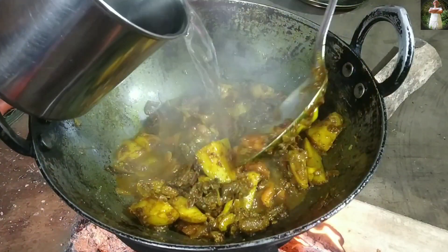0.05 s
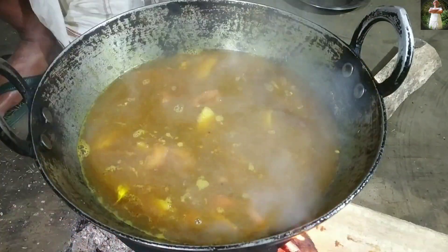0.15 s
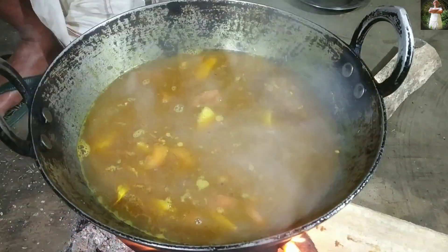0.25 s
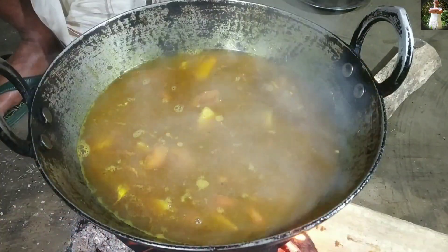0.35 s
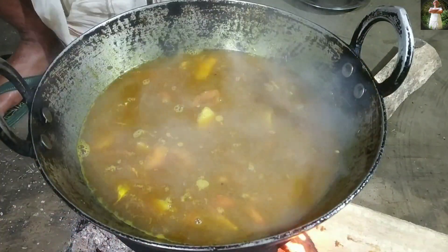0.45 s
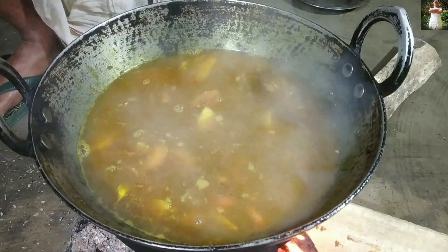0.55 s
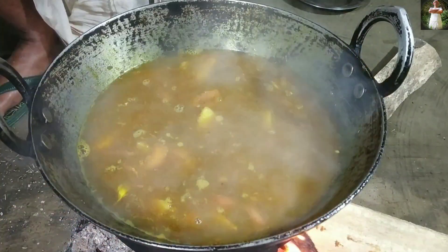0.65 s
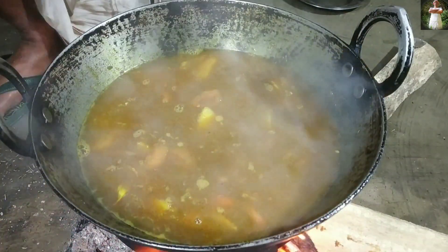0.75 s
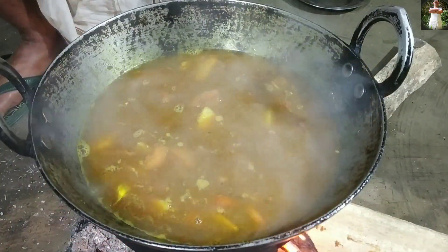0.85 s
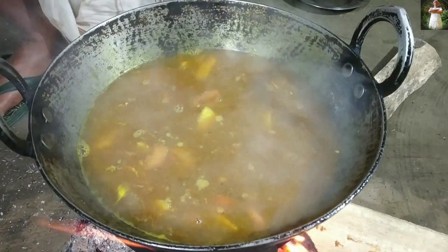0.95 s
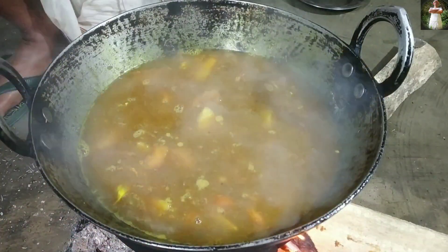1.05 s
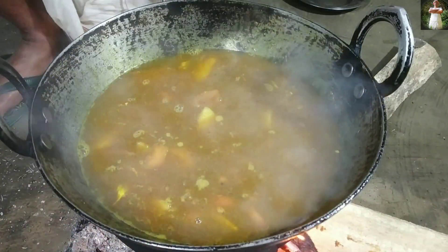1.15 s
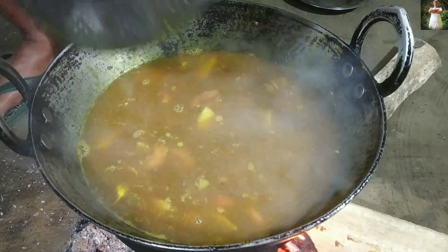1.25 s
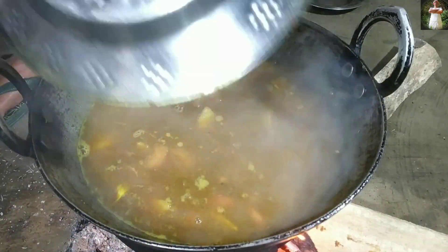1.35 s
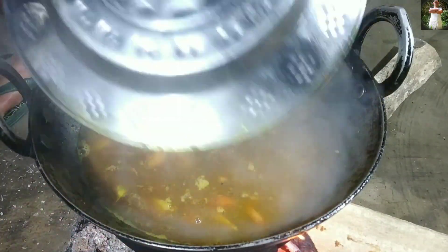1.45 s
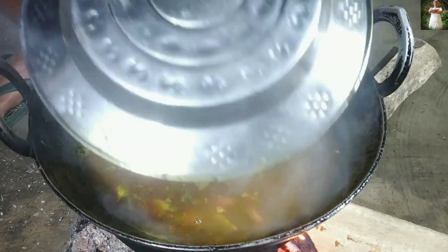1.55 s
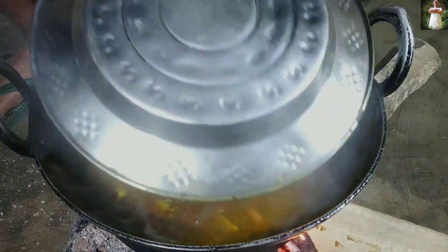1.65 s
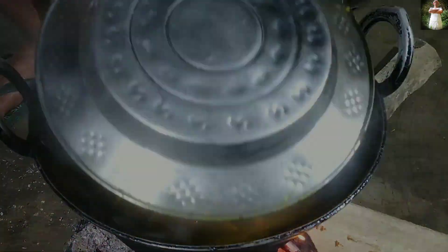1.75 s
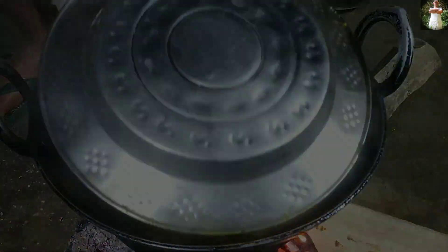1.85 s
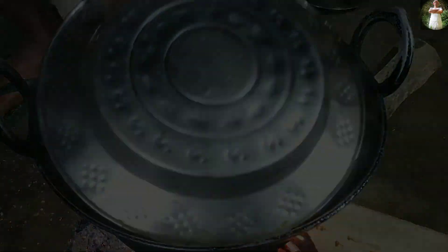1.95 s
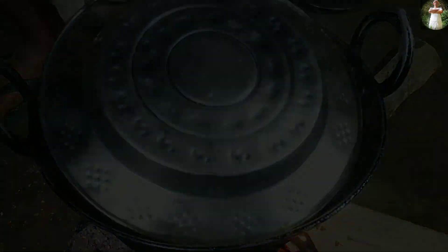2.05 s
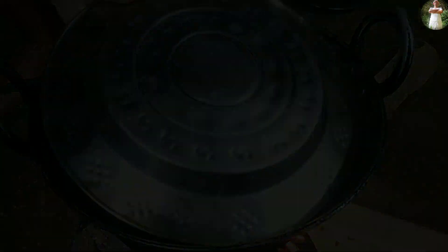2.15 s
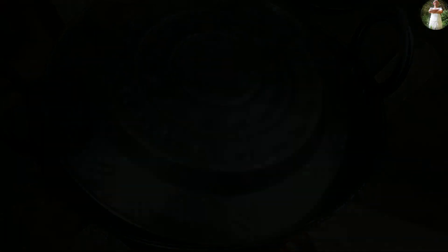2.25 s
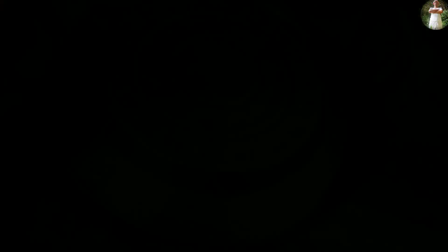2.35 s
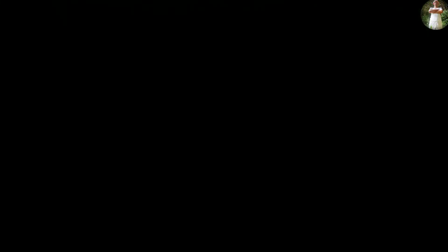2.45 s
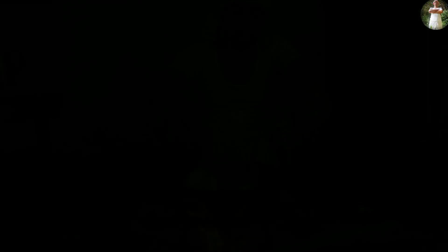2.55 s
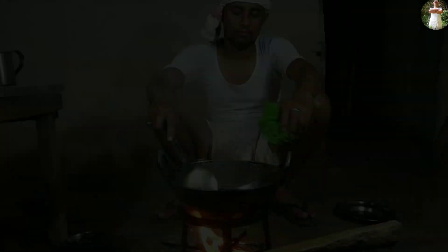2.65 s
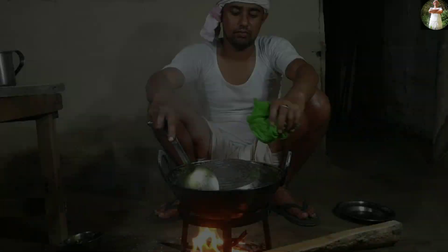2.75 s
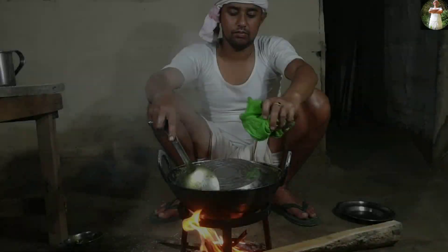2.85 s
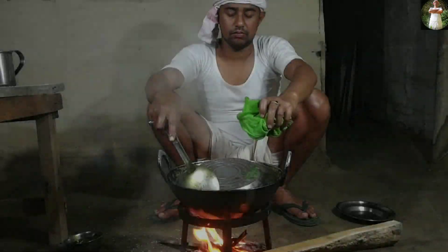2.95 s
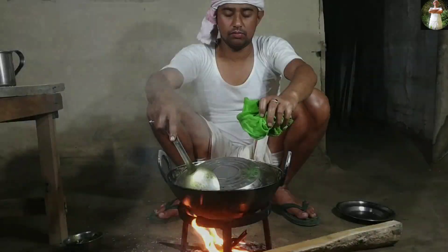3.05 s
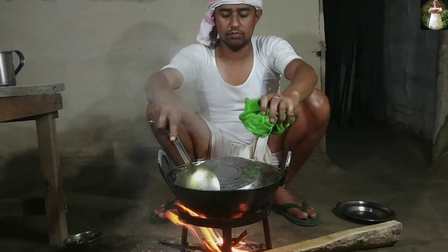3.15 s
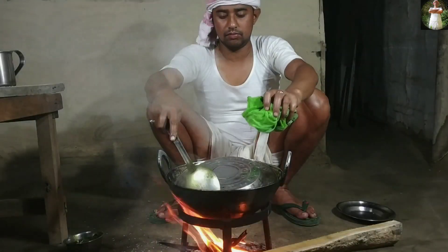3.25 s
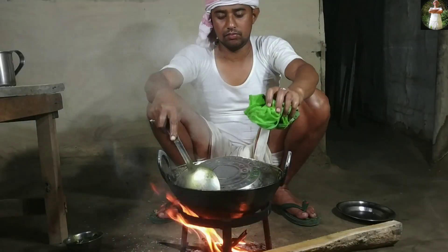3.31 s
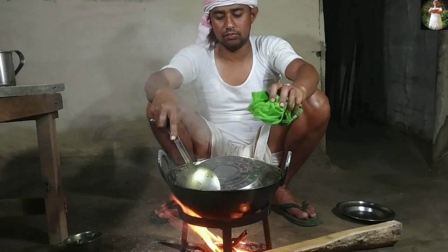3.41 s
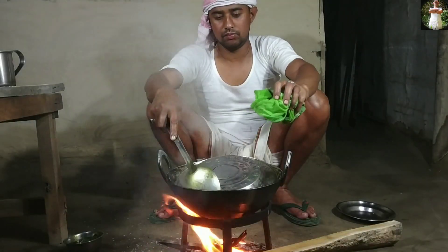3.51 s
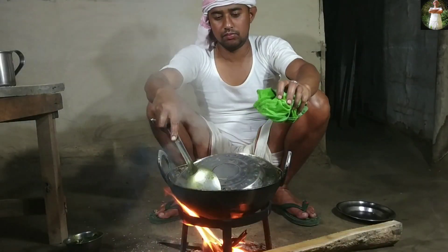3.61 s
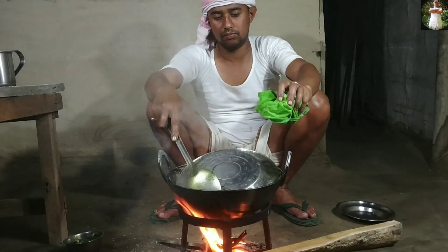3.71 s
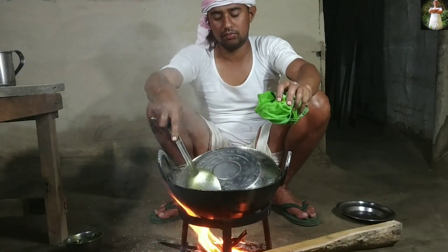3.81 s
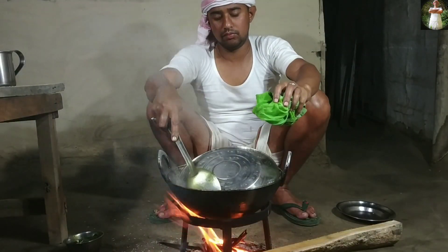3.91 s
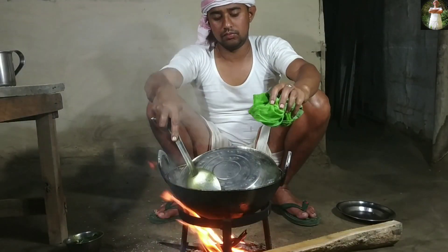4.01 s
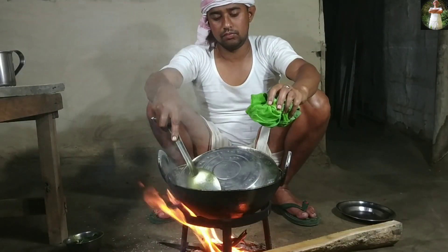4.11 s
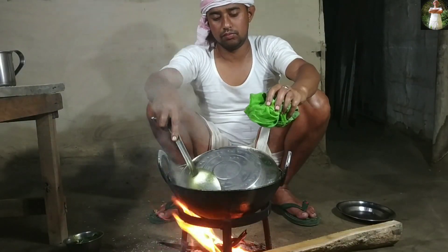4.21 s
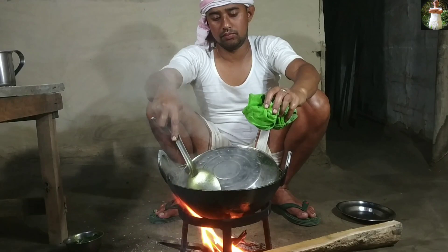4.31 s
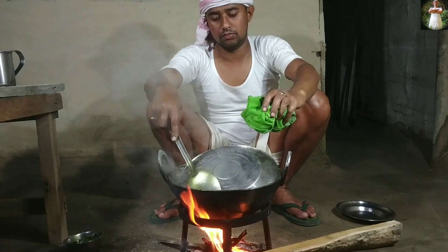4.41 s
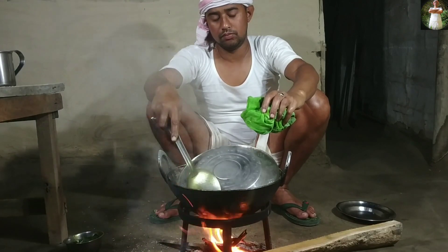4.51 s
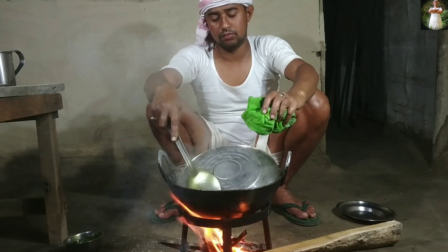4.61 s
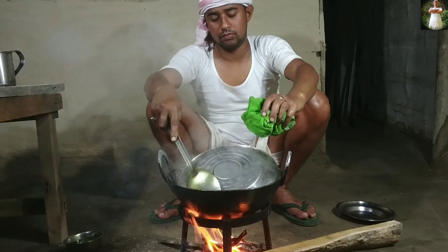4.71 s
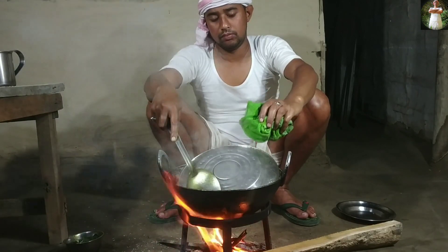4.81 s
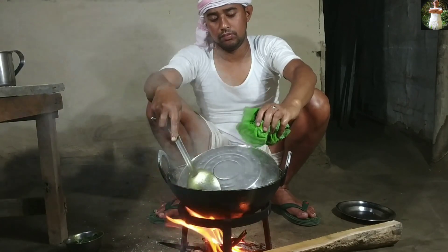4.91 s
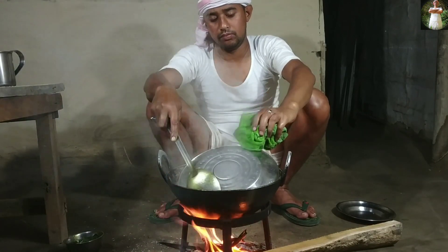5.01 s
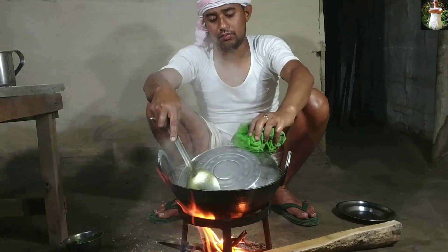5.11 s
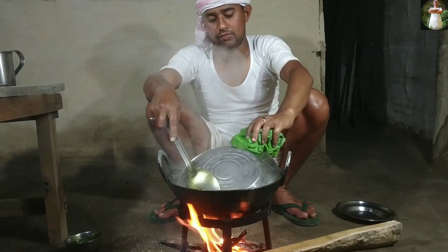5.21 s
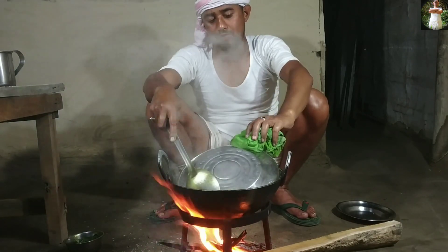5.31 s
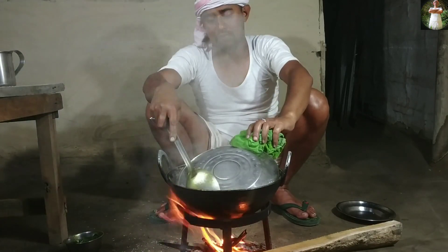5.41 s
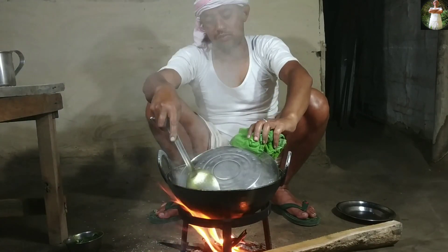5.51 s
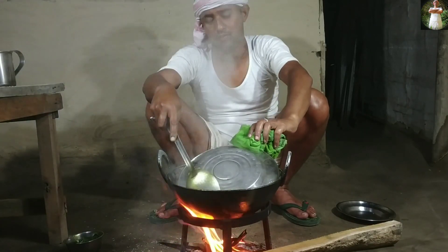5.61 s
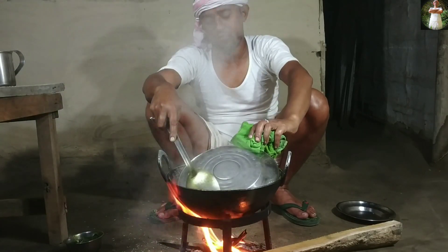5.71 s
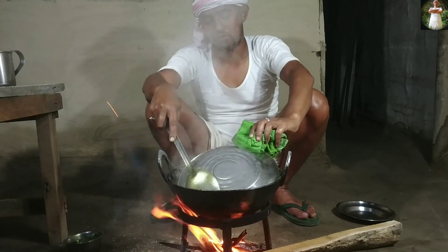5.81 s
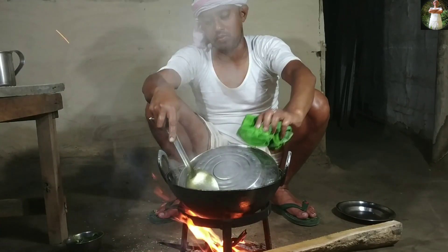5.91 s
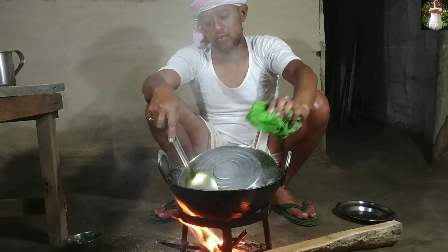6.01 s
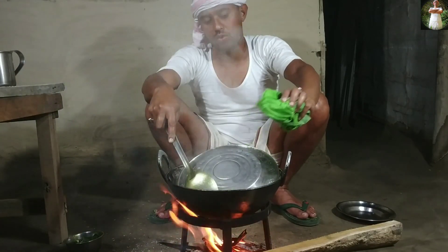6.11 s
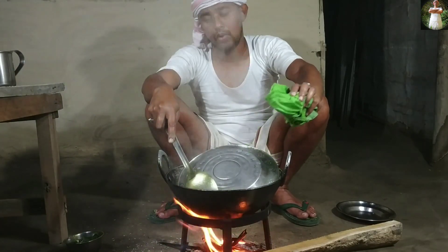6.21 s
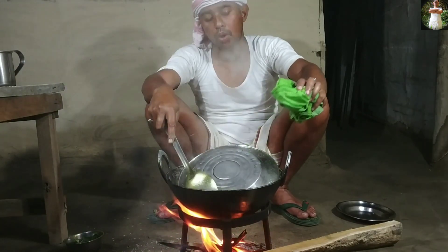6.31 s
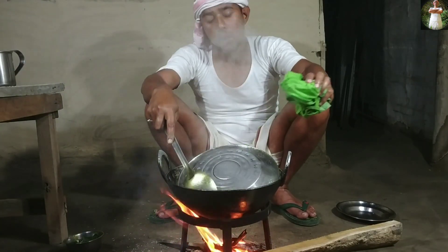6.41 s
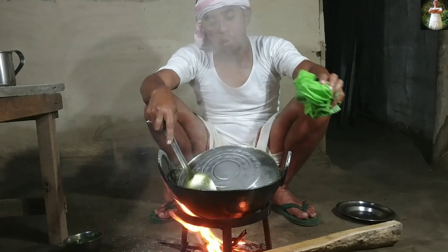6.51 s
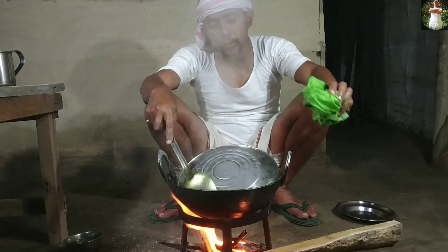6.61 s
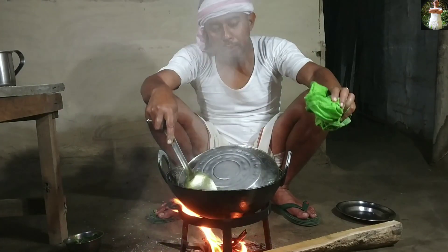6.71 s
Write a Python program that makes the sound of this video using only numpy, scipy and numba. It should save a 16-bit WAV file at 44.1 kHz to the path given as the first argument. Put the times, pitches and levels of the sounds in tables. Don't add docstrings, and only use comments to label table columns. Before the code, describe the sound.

Close in a small bare shelter, a split-second loud sizzle cuts abruptly to softer steady steam hiss over low flame. A steel cup rings and bounces, faint hoarse birds chirp far off, an ember snaps. A metal lid scrapes along the rim, then drops with a low clang. The hiss fades to brief silence; then the covered wok fades in, with a ladle clink, hollow gurgling bubbles, soft thuds and crackling wood.

```python
import sys
import numpy as np
from scipy import signal
from scipy.fft import rfft, irfft
from scipy.io import wavfile
from scipy.ndimage import uniform_filter1d
from numba import njit

SR = 44100
rng = np.random.default_rng(int(sys.argv[2]) if len(sys.argv) > 2 else 0)


def ratio(d):
    e = np.asarray(d, float) / 20
    return 10 ** e


def int16_out(signal):
    q = np.round(np.clip(np.atleast_2d(signal).T, -1, 1) * 32767)
    wavfile.write(sys.argv[1], SR, q.astype(np.int16))


N = 298116
TIME = np.arange(N) / SR

# (time [s], gain [dB])
SCENE_FADERS = [
    [(0, 5.5), (.028, 5.5), (.052, 10), (.066, -4.5), (.072, -31), (.083, -44), (.092, -78)],
    [(.187, 4), (.8, 1.5), (1.4, 5.5), (1.7, 2), (2.0, -6.5), (2.2, -6), (2.35, -16.5), (2.46, -27),
     (2.515, -43)],
    [(2.61, -50.5), (2.66, -23), (2.8, -13), (3.0, -2), (3.3, 3), (3.8, 5.5), (4.3, 3.5), (5.5, 1.5),
     (6.76, 3)],
]
# (time [s], peak level [dB], brightness [dB], flurry length [s])
LARGE_BUBBLES = [(3.134, -37, -15, 0.077), (3.297, -62, -15, 0.04), (3.467, -34, -10.5, 0.13),
                 (3.584, -34, -13, 0.096), (3.675, -36.5, -14, 0.052), (3.724, -48, 3, 0.017),
                 (3.747, -31, -21, 0.04), (4.01, -43, -9, 0.018), (4.221, -45, -6, .02),
                 (4.785, -58, -12, 0.017), (5.552, -47, -5.5, 0.017), (5.73, -39, -12, 0.014),
                 (5.914, -51, -5, 0.036), (6.14, -50, -17, .02), (6.516, -44, -4, 0.021),
                 (6.33, -35, -21, .03), (3.944, -49, -20, 0.048), (4.054, -24, -22, 0.023),
                 (4.159, -44, -4, 0.035), (4.269, -37.5, -6, 0.039), (4.384, -36, -3.5, 0.034),
                 (4.595, -41, -8.5, 0.05), (4.639, -38, -14, 0.052), (4.883, -34.5, -8, 0.034),
                 (5.059, -38, 0.5, 0.02), (5.16, -32.5, -15, 0.034), (5.235, -34.5, -13.5, 0.049),
                 (5.305, -36.5, -5, 0.015), (5.433, -40, -6.5, 0.037), (5.468, -34, -17, 0.039),
                 (5.593, -40, -4, 0.02), (5.706, -38.5, -5, 0.027), (5.832, -34.5, -15, 0.036),
                 (5.950, -30, -18, 0.065), (6.046, -36, -10, 0.01), (6.299, -29.5, -12.5, 0.055),
                 (6.396, -34, -6, 0.011), (6.476, -40, -8, 0.061), (6.621, -44, -8, 0.054),
                 (6.697, -25, -5, 0.03)]


def level(x, db):
    return x * ratio(db) / np.sqrt(np.mean(x ** 2) + 1e-30)


def curve(table, column, off=-120):
    rows = np.array(table, float)
    return np.interp(TIME, rows[:, 0], rows[:, column], off, off)


def gain_at(table, size):
    hz, db = np.transpose(table)
    bins_hz = np.fft.rfftfreq(size, 1 / SR)
    return ratio(np.interp(np.log(bins_hz + 1), np.log(hz), db))


def diffuse(colour, size=N):
    # (frequency [Hz], side minus mid [dB])
    port_difference = [(60, -6), (110, -14.5), (200, -15), (380, -7.5), (700, -1.5), (1290, -0.5),
                       (2380, 0), (4400, 0), (8120, 0), (15000, -1)]
    mid, side = rfft(rng.standard_normal((2, size))) * gain_at(colour, size)
    mid, side = irfft(np.array([mid, side * gain_at(port_difference, size)]), size)
    return np.array([mid + side, mid - side]) / np.std(mid)


def aimed(x, lag_s, share):
    mid = x.mean(axis=0)
    same = np.array([np.roll(mid, round(lag_s * SR)), mid]) * np.sqrt(2)
    return np.sqrt(share) * same + np.sqrt(1 - share) * x[:, ::-1]


@njit
def svf(x, hz, width):
    y, b, l = np.empty(len(x)), 0., 0.
    for i in range(len(x)):
        g, k = np.tan(np.pi * hz[i] / SR), width / hz[i]
        v = (b + g * (x[i] - l)) / (1 + g * (g + k))
        b, l, y[i] = 2 * v - b, l + 2 * g * v, k * v
    return y


def band(x, hz, width):
    return signal.lfilter(*signal.iirpeak(hz, hz / width, fs=SR), x)


def walk(rate):
    hold = int(SR / rate)
    steps = rng.standard_normal(4096)[np.arange(N) // hold % 4096]
    return 1.28 * uniform_filter1d(uniform_filter1d(steps, hold), hold)


def add(out, s, piece):
    i = int(s * SR)
    out[:, i:i + piece.shape[1]] += piece[:, :out.shape[1] - i]


def fade(t60, size):
    return np.exp(-np.log(1000) * np.arange(size) / SR / t60)


def bed(colour, db, swell_db, flicker_db):
    noise = diffuse(colour)
    flame = signal.sosfilt(signal.butter(2, 500, fs=SR, output="sos"), noise)
    steam = noise - flame
    return ratio(db) * (flame * ratio(swell_db * walk(6.5)) + steam * ratio(flicker_db * walk(25)))


def struck(blows, modes, clatter, clatter_t60, crack, lag_s):
    out, t = np.zeros((2, N)), np.arange(SR // 2) / SR
    hz, db, t60 = np.array(modes, float).T[:, :, None]
    decay = np.exp(-np.log(1000) * t / t60)
    clatter_shape = fade(clatter_t60, size=len(t)) + crack * fade(0.0019, size=len(t))
    for s, ring_db, clatter_db, treble_db in blows:
        chance = .75 * rng.standard_normal((len(modes), 3))
        ring = []
        for port in range(2):
            mode_gain = ratio(db + treble_db * (hz > 4100) + 2 * chance[:, port:port + 1])
            phase = 2 * np.pi * hz * (t + port * lag_s) + 0.85 * chance[:, 2:]
            ring.append(np.sum(mode_gain * decay * np.sin(phase), axis=0))
        colour = [(f, d + treble_db * (f > 4100)) for f, d in clatter]
        burst = aimed(diffuse(colour, size=len(t)), lag_s, share=0.39) * clatter_shape
        blow = ratio(ring_db) * np.array(ring) + ratio(clatter_db) * burst
        add(out, s, blow * np.minimum(t / 0.00083, 1))
    return out


def bursts(events, spread, skirt_db, crest_db, crack, rise_s):
    out, size = np.zeros((2, N)), 16384
    for s, db, hz, t60 in events:
        colour = [(hz / spread ** 2, 1.5 * skirt_db), (hz / spread, skirt_db), (hz, 0),
                  (hz * spread, skirt_db), (hz * spread ** 2, 1.7 * skirt_db), (hz * 8, 2.5 * skirt_db)]
        shape = (fade(t60, size) + crack * fade(0.0099, size)) * (1 - fade(rise_s, size))
        add(out, s, ratio(db - crest_db) * diffuse(colour, size) * shape)
    return out


def sizzle():
    # (frequency [Hz], level per Hz [dB])
    sizzle_colour = [(35, -87), (60, -40), (146, -18.5), (666, -13.5), (1310, -11.5), (1510, -10),
                     (2300, -14), (3040, -9), (3420, -11.5), (6100, -2), (8710, -14), (13000, -10),
                     (16000, -9.5)]
    return aimed(bed(sizzle_colour, -36.5, swell_db=7.5, flicker_db=0.6), lag_s=.00036, share=0.41)


def knocks():
    # (time [s], peak level [dB], frequency [Hz], 60 dB decay [s])
    knock_events = [(.549, -37.5, 287, 0.032), (.549, -42, 600, 0.025), (1.451, -43, 240, 0.046),
                    (1.452, -52, 480, 0.037), (2.0215, -16, 1385, 0.017), (2.0305, -39.5, 4800, .02),
                    (2.0305, -39, 6430, .025), (2.0212, -33.5, 3370, 0.018), (2.041, -38, 2950, 0.06),
                    (2.0229, -28, 249.6, .08), (4.386, -41, 1100, 0.037), (4.885, -47.5, 1140, .04),
                    (5.474, -38, 503, 0.047), (6.477, -50, 1010, 0.028), (5.44, -46, 1300, .03),
                    (3.0468, -34.5, 1130, 0.007), (4.055, -47, 900, 0.032), (5.059, -51, 1070, 0.022),
                    (5.595, -49, 1010, 0.026), (5.595, -46, 1900, 0.035), (5.705, -45, 900, 0.027),
                    (6.048, -42, 1120, .025), (6.697, -39, 1100, 0.027), (0.003, -42, 55, .15),
                    (0.189, -32, 55.3, 0.13), (0.59, -50, 55, .12), (0.862, -45, 55, .12),
                    (1.275, -52, 55, .12), (2.021, -38, 55, 0.2), (2.772, -48, 55, .12),
                    (3.047, -46, 55.4, .1), (3.583, -35, 50, .1), (5.478, -43, 55, .15),
                    (5.525, -43, 55, .1), (5.96, -54, 55, .1)]
    out, t = np.zeros((2, N)), np.arange(8192) / SR
    for s, db, hz, t60 in knock_events:
        tone = np.sin(2 * np.pi * hz * t) * fade(t60, size=len(t))
        add(out, s, (ratio(db) * tone * np.minimum(t * hz * 2, 1))[None])
    return out


def open_wok():
    # (frequency [Hz], level per Hz [dB])
    open_colour = [(18, -58), (30, -22.5), (233, 0.5), (374, -10.5), (889, -17), (1130, -17), (1540, -17.5),
                   (2680, -20.5), (3400, -18.5), (5040, -21.5), (13300, -23), (14800, -21), (16000, -17)]
    return bed(open_colour, -55.5, swell_db=3.0, flicker_db=1.37)


def cup():
    # (frequency [Hz], level [dB], 60 dB decay [s])
    cup_modes = [(799, -24, 0.43), (860, -14.5, 0.089), (1010, -7.5, 0.17), (1050, -5.5, 0.18),
                 (1100, -4.5, 0.25), (1104, -10, 0.23), (1550, -15, 0.1), (2130, -7.5, 0.31),
                 (2620, -21, 0.12), (3580, -12, 0.2), (3670, -2.5, 0.041), (3840, -20.5, 0.22),
                 (4676, -12, 0.071), (7370, -25, 0.25), (7940, -23.5, 0.15), (8452, -21, .19),
                 (9092, -3, .1), (9254, -21.5, .4), (9964, -20.5, .4), (10190, -16.5, .3),
                 (10160, -5.5, 0.13), (10720, -12.5, 0.15), (10950, -13, 0.1), (11280, -25, .17),
                 (12500, -15, .11)]
    # (frequency [Hz], level per Hz [dB])
    cup_clatter = [(59, -48.5), (100, -31.5), (244, -14.5), (492, -23), (752, -4), (818, -4.5),
                   (1080, -6.5), (1250, -36), (1480, -12), (1910, -16), (2270, -13), (4470, -12),
                   (5080, -24), (10700, -11), (16000, -23.5)]
    # (time [s], ring [dB], clatter [dB], extra treble [dB])
    cup_blows = [
        (.1892, -26, -29.5, -11),
        (.1978, -24, -31, 2.4),
        (.2055, -37.5, -39.5, -4.2),
        (.2205, -32, -36.5, -7),
        (.242, -39.5, -36, -1.5),
        (.252, -42, -43, -4),
    ]
    return struck(cup_blows, cup_modes, cup_clatter, clatter_t60=0.2, crack=1.0, lag_s=0.00026)


def birds():
    # (start [s], end [s], frequency [Hz], width [Hz], level [dB])
    chirps = [
        (0.384, 0.464, 3100, 350, -59.5),
        (0.465, 0.518, 3130, 350, -61),
        (0.603, 0.756, 2160, 400, -56),
    ]
    out = 0
    for start, end, hz, width, db in chirps:
        shape = np.interp(TIME, [start, start + 0.017, end, end + 0.056], [0, 1, 0.9, 0])
        call = band(band(rng.standard_normal((2, N)), hz, width), hz, width)
        out = out + level(call, db) * shape
    return out


def sharp_snaps():
    # (time [s], peak level [dB], centre [Hz])
    snap_events = [(0.6724, -49, 2180), (0.824, -39, 6050), (0.861, -33, 6400), (1.2733, -41, 9600),
                   (2.1286, -39, 2460), (2.1417, -34.5, 2700), (2.282, -46.5, 12000),
                   (2.4177, -60.5, 11000), (2.66, -68.5, 9000), (3.5832, -27, 6300), (3.6037, -33, 5930),
                   (3.7525, -36, 6500), (4.2788, -42, 7720), (4.4887, -36.5, 9300), (4.747, -44, 7570),
                   (5.221, -39.5, 11600), (5.4772, -34.5, 12000), (5.5227, -35, 11000), (6.6107, -39, 9950)]
    events = [(*snap, 0.1) for snap in snap_events]
    return bursts(events, spread=1.2, skirt_db=-5, crest_db=14.0, crack=1.27, rise_s=0.0033)


def drag():
    # (time [s], pressure level [dB])
    drag_pressure = [(.82, -53.5), (.9, -56.5), (.99, -53), (1.07, -48), (1.14, -46.5), (1.21, -44),
                     (1.27, -54), (1.33, -59.5), (1.5, -88), (1.75, -94)]
    # (frequency [Hz], width [Hz], level [dB])
    rim_modes = [
        (1567, 58, 5.5),
        (3400, 400, -3),
        (4670, 190, -4),
    ]
    # (time [s], level [dB])
    air_push = [(1.25, -91), (1.4, -62.5), (1.55, -57), (1.7, -60.5), (1.8, -89), (1.95, -70)]
    grit = ratio(1.5 * walk(120))
    rasp = diffuse([(1500, -22.5), (3100, 0.5), (4050, -8.5), (5000, -2), (9000, 0.5), (16000, -7.5)]) * grit
    push = rng.standard_normal((2, N)) * grit
    rim, *overtones = (ratio(db) * level(band(band(push, hz, w), hz, 2 * w), 0) for hz, w, db in rim_modes)
    pressure_db = curve(drag_pressure, 1, off=-200)
    ring_gain = ratio(-65.5 + 0.48 * (pressure_db + 44.0) + 4.4 * walk(12))
    air = diffuse([(200, -9.5), (400, -1.0), (900, -5.5), (1500, -5.5), (2500, -27.0)])
    air = air * ratio(curve(air_push, 1) + 2.0 * walk(25))
    scrape = ratio(curve(drag_pressure, 1)) * (rasp + ratio(-7.5) * sum(overtones))
    return scrape + ring_gain * rim + air


def bumps():
    # (time [s], peak level [dB], centre [Hz], 60 dB decay [s])
    bump_events = [
        (0.864, -37, 255, 0.41),
        (0.898, -40, 274, 0.22),
        (1.298, -40, 245, 0.1),
        (1.451, -41, 214, 0.23),
        (2.358, -56.5, 336, 0.063),
        (3.046, -34, 425, 0.075),
        (3.583, -46, 218, 0.12),
        (5.5, -44, 487, 0.063),
    ]
    return bursts(bump_events, spread=1.42, skirt_db=-20.0, crest_db=12.5, crack=0.21, rise_s=0.022)


def lid():
    # (frequency [Hz], level [dB], 60 dB decay [s])
    lid_modes = [(254, -0.5, 0.18), (273, -4.5, 0.21), (425, -21.5, 0.31), (561, -14.5, 0.17),
                 (640, -6.5, 0.37), (805, -20.5, 0.062), (820, 6, 0.03), (870, -13.5, 0.302),
                 (1060, -7, 0.44), (1230, -4, 0.23), (1346, 2, .08), (1450, 9.5, 0.017), (1535, -11, .19),
                 (1644, -9.5, 0.24), (1840, -10.5, 0.14), (2170, -13.5, 0.09), (2440, -17, 0.18),
                 (2864, -23, .3), (2972, -18.5, 0.15), (3270, -17.5, 0.3), (4204, -40, .3),
                 (4660, -31.5, 0.35), (5970, -28, 0.23), (6570, -29, 0.18), (6901, -33, .3)]
    # (frequency [Hz], level per Hz [dB])
    lid_clatter = [(59, -50), (100, -33.5), (234, 5.5), (406, -16), (595, 7), (950, -23.5), (1080, 1.5),
                   (1610, -2), (2040, -13), (2930, -13.5), (4870, -29), (5420, -30.5), (6700, -21),
                   (8200, -35), (16000, -55.5)]
    # (time [s], ring [dB], clatter [dB], extra treble [dB])
    lid_blows = [
        (2.0208, -26.5, -34.5, -0.5),
        (2.0272, -41.5, -36.5, 3),
        (2.0316, -44, -41, -2.5),
    ]
    return struck(lid_blows, lid_modes, lid_clatter, clatter_t60=0.25, crack=1.6, lag_s=.00005)


def closed_wok():
    # (frequency [Hz], level per Hz [dB])
    closed_colour = [(30, -5.5), (112, -19), (220, 0), (345, -12.5), (700, -19), (1220, -19.5),
                     (2120, -22.5), (4000, -22), (6550, -25), (11000, -23), (14800, -23.5), (16000, -22.5)]
    return bed(closed_colour, -54.5, swell_db=-1.5, flicker_db=-0.3)


def puffs():
    # (time [s], peak level [dB], centre [Hz], 60 dB decay [s])
    puff_events = [
        (3.58, -39, 1450, 0.34),
        (3.60, -37, 6300, 0.21),
        (3.74, -33.5, 1320, 0.35),
        (3.745, -45, 6000, 0.27),
        (2.63, -68, 285, 4.6),
        (5.40, -41.5, 1180, 0.23),
    ]
    return bursts(puff_events, spread=1.33, skirt_db=-9.5, crest_db=3.5, crack=0, rise_s=0.14)


def ladle():
    # (frequency [Hz], level [dB], 60 dB decay [s])
    ladle_modes = [(282, -12.5, 0.47), (443, -7.5, 0.26), (1053, -8.5, 0.39), (1300, 10.5, 0.016),
                   (1598, -10, 0.34)]
    # (frequency [Hz], level per Hz [dB])
    ladle_clatter = [(35, -65), (60, -48), (180, -2), (437, -7), (579, -9), (1310, -9), (1780, -21),
                     (2470, -9), (4220, -17), (8120, -18), (16000, -36)]
    # (time [s], ring [dB], clatter [dB], extra treble [dB])
    ladle_blows = [
        (2.7722, -42.5, -46, 1.5),
        (2.7755, -54, -53, -1),
        (2.79, -46, -53.5, 1),
    ]
    return struck(ladle_blows, ladle_modes, ladle_clatter, clatter_t60=0.39, crack=1.7, lag_s=.00002)


def ticks():
    # (time [s], peak level [dB], centre [Hz], 60 dB decay [s])
    tick_events = [(3.0465, -41, 1200, 0.015), (6.697, -54, 890, 0.023), (4.1, -47, 1100, 0.027),
                   (6.477, -54, 1000, 0.025), (2.8, -44, 1450, 0.035), (6.047, -48, 1300, 0.017),
                   (3.0465, -35, 2400, 0.019), (4.4, -40, 1900, .05), (5.2, -47, 1150, .08),
                   (2.8, -47, 6200, .04), (3.605, -50, 4500, 0.12)]
    return bursts(tick_events, spread=1.2, skirt_db=-8.5, crest_db=5.0, crack=0.37, rise_s=0.0018)


def pops(rate, uneven_db):
    chance = rng.random((3, N))
    size = ratio(uneven_db * np.minimum(-np.log(chance[1] + 1e-9), 3)) * np.sign(chance[2] - .5)
    return level((chance[0] < rate / SR) * size * ratio(2.0 * walk(30)), 0)


def flurries():
    out, t = np.zeros((2, N)), np.arange(SR // 2) / SR
    for s, db, bright_db, length in LARGE_BUBBLES:
        shape = (1 - np.exp(-t / 0.0064)) * np.exp(-t / length)
        flurry_db = -36 + 0.51 * (db + 36) - 11.5
        add(out, s, ratio(flurry_db) * shape * np.array([[1], [ratio(bright_db + 7)]]))
    return out


def blips():
    out, t = np.zeros((1, N)), np.arange(1024) / SR
    ring_cycles, glide, per_s = 4.16, 0.23, 70
    for when, tune, size in rng.random((int(per_s * N / SR), 3)):
        cycles = 1100 * 2 ** (0.6 * (2 * tune - 1)) * t
        tone = np.sin(2 * np.pi * cycles * (1 + glide * cycles / ring_cycles / 2))
        tone = tone * np.exp(-cycles / ring_cycles * 2)
        add(out, when * N / SR, (tone * np.minimum(cycles, 1) * ratio(-14 * size))[None])
    return level(out[0], 0)


def glugs(pocket_hz):
    out, t = np.zeros((1, N)), np.arange(4096) / SR
    for (s, db, bright_db, _), size in zip(LARGE_BUBBLES, rng.standard_normal(len(LARGE_BUBBLES))):
        hz = pocket_hz[int(s * SR)] * (1.052 + 0.055 * size)
        shape = np.exp(-t * hz / 4.84) * (1 - np.exp(-t / 0.0041))
        tone = np.sin(2 * np.pi * hz * t * (1 + 0.52 * t)) * shape * ratio(4.0)
        slap = band(band(rng.standard_normal(len(t)), 1080, 410), 710, 2040)
        slap = level(slap, 0) * fade(0.037, size=len(t))
        bubble = (tone + ratio(bright_db) * slap) * np.minimum(t / 0.00067, 1)
        add(out, s, ratio(db - 5.5) * bubble[None])
    return out[0]


def boil():
    # (time [s], level [dB], pitch of the steam pocket [Hz])
    simmer = [
        (2.9, -65, 356),
        (3.32, -43, 384),
        (3.55, -47, 451),
        (4.15, -51, 484),
        (4.36, -57.5, 516),
        (5.09, -56.5, 458),
        (5.21, -54.5, 501),
        (6.76, -51, 474),
    ]
    # (frequency [Hz], width [Hz], level [dB])
    wok_modes = [
        (240, 60, -3.5),
        (758, 120, -1),
        (1155, 260, -9),
        (1270, 820, -10.5),
    ]
    pocket_hz = curve(simmer, 2, off=370)
    simmer_db = curve(simmer, 1)
    flurry, shine = flurries()
    pocket = svf(pops(700, uneven_db=1.0), pocket_hz * (1 + 0.022 * walk(40)), 160.0)
    pocket = level(svf(pocket, pocket_hz, 210.0), -1.3)
    wok, *upper = (level(band(band(pops(400, uneven_db=3.5), hz, width), hz, 2 * width), db)
                   for hz, width, db in wok_modes)
    full = np.clip((TIME - 3.8) / 0.14 + 1, 0, 1)
    boom_db = -57 + 0.2 * (simmer_db + 44.5) + 2.5 * walk(15) - 5.8 * (0.5 - full)
    boom = ratio(boom_db) * (TIME > simmer[0][0])
    bright = sum(upper) + ratio(-7) * blips()
    mix = (pocket * np.hypot(ratio(simmer_db), flurry)
           + wok * np.hypot(boom, ratio(-2.5) * flurry)
           + bright * np.hypot(ratio(simmer_db - 8) * (0.51 + 0.52 * full), shine))
    return mix - 0.99 * (1 - full) * band(mix, 670, 300) + glugs(pocket_hz)


def shelter(x):
    tail = diffuse([(100, 1), (10000, -6.5)], size=16384) * fade(0.22, size=16384)
    tail = tail * ratio(-6) / np.sqrt(np.sum(tail ** 2, axis=1, keepdims=True))
    return x + signal.fftconvolve(x[None], tail)[:, :N]


def scene():
    fader = [ratio(curve(part, 1, off=-200)) for part in SCENE_FADERS]
    beds = fader[0] * sizzle() + fader[1] * open_wok() + fader[2] * closed_wok()
    metal = cup() + lid() + ladle()
    small = sharp_snaps() + bumps() + puffs() + ticks() + knocks()
    stew = shelter(boil())
    sounding = (TIME < 2.515) | (TIME > 2.61)
    pan = ratio(1.24 / 2 * np.array([[-1], [1]]) * (TIME < 2.56))
    return pan * (beds + sounding * (metal + small + drag() + birds() + stew))


def starved(x, floor, spread):
    hz, _, z = signal.stft(x, SR, nperseg=2048)
    power = np.sum(np.abs(z) ** 2, axis=0) + 1e-30
    budget = rng.standard_normal((len(hz) // 8 + 1, z.shape[2]))
    budget = uniform_filter1d(budget, size=2) * np.sqrt(2)
    budget = np.repeat(budget, 8, axis=0)[:len(hz)]
    share = np.interp(hz, [2100, 3200, 9000, 14000], [0, 1, 1, .4])[:, None]
    around = uniform_filter1d(power, size=48, axis=0)
    keep = power > share * floor * np.exp(spread * budget) * around
    treble = power[hz > 2000].sum(axis=0)
    attack = treble > 3 * np.roll(treble, 1)
    keep[:, attack | np.roll(attack, 1)] = True
    return signal.istft(z * keep, SR, nperseg=2048)[1][:, :N]


def top_cut(x):
    return signal.sosfilt(signal.butter(12, 16810, fs=SR, output="sos"), x)


def record(dry):
    high = signal.sosfilt(signal.butter(3, 150, "high", fs=SR, output="sos"), dry)
    heard = starved(high + ratio(-29.5) * dry, floor=.65, spread=1.45)
    on_air = sum(curve(part, 1, off=-200) > -200 for part in SCENE_FADERS)
    heard = (heard + ratio(-91) * rng.standard_normal((2, N))) * on_air
    mix = signal.sosfilt(signal.ellip(10, .2, 70, 15480, fs=SR, output="sos"), heard)
    return top_cut(mix)


dry = scene()
out = record(dry)
int16_out(out)
```